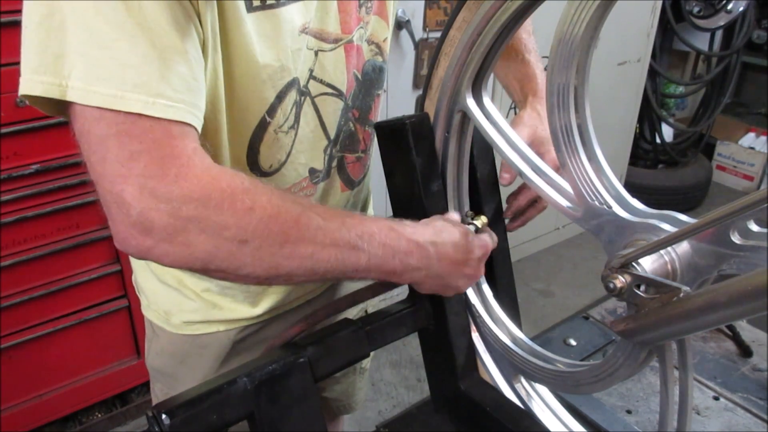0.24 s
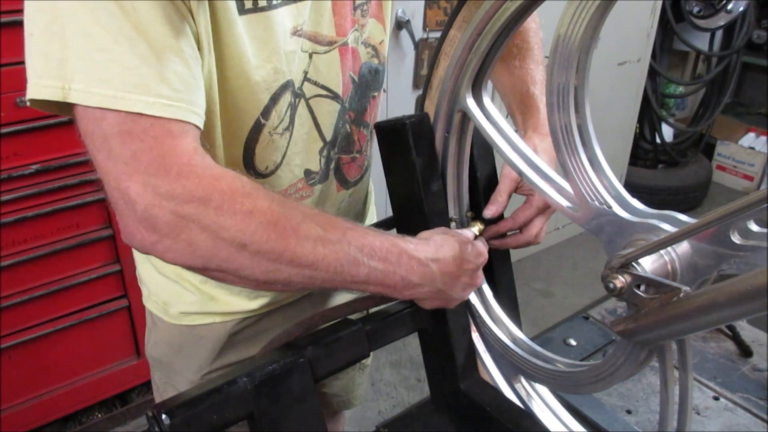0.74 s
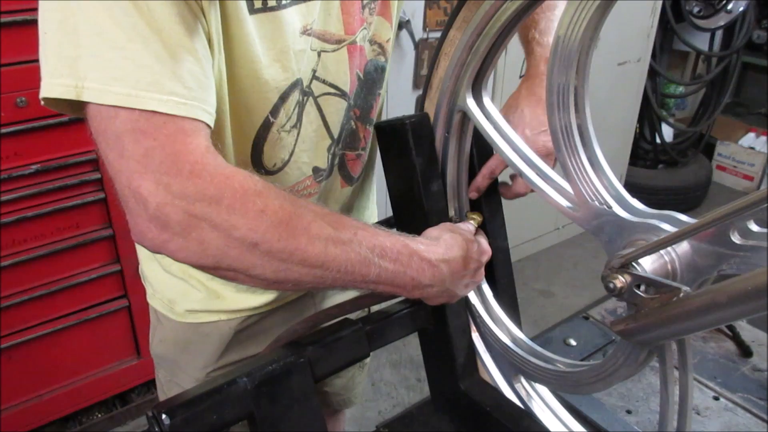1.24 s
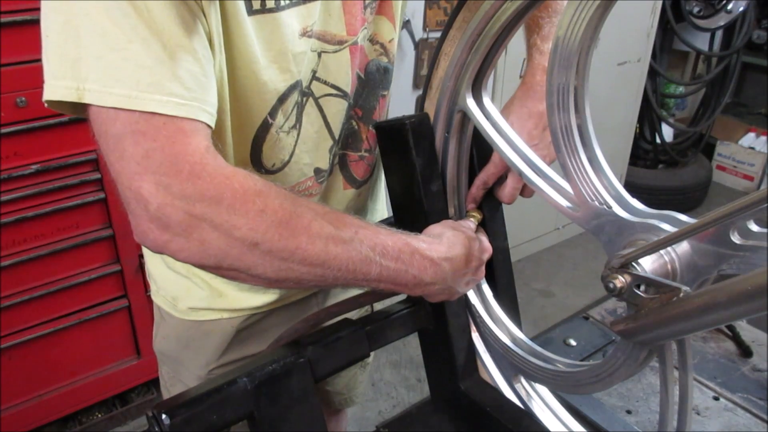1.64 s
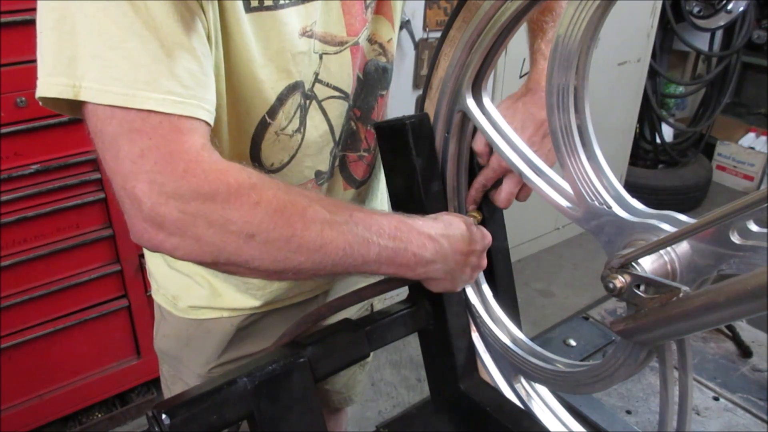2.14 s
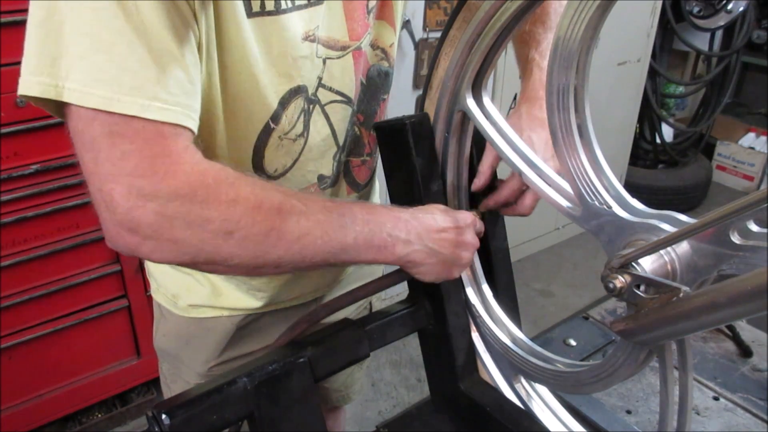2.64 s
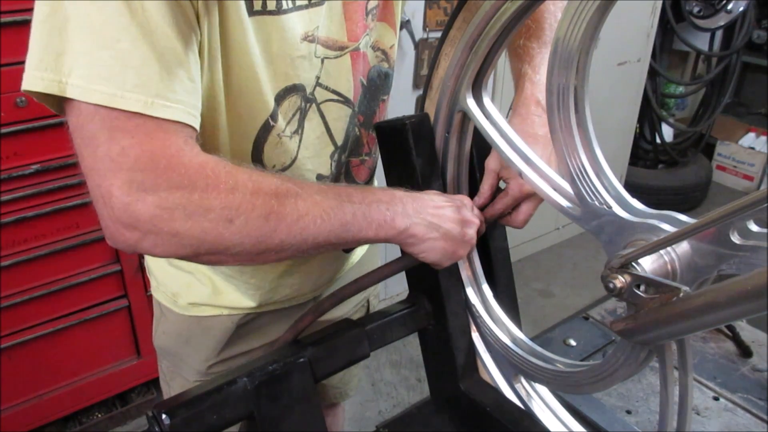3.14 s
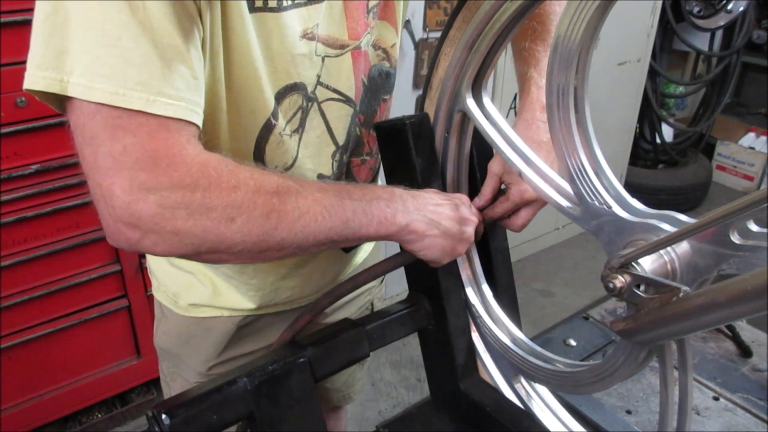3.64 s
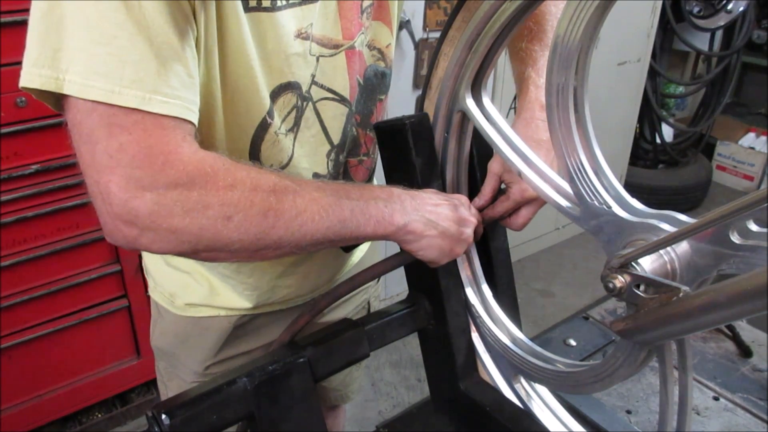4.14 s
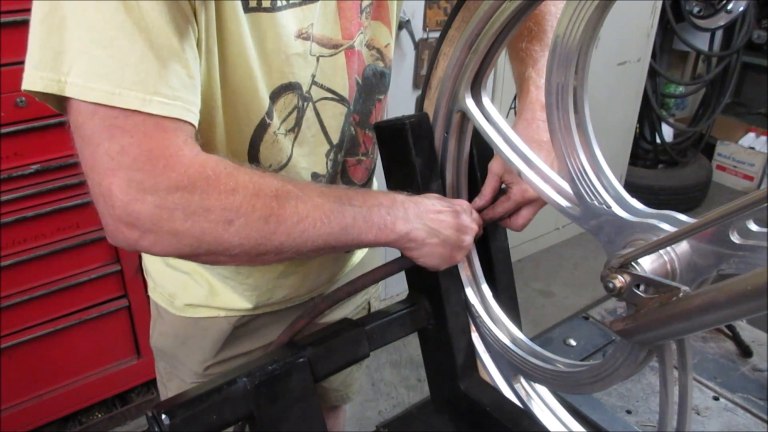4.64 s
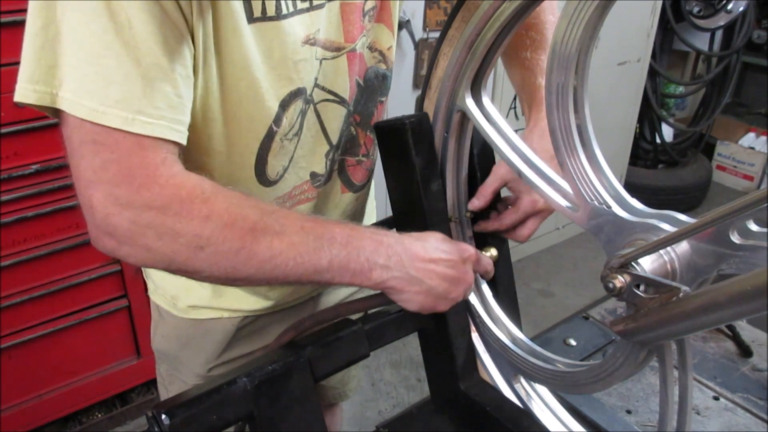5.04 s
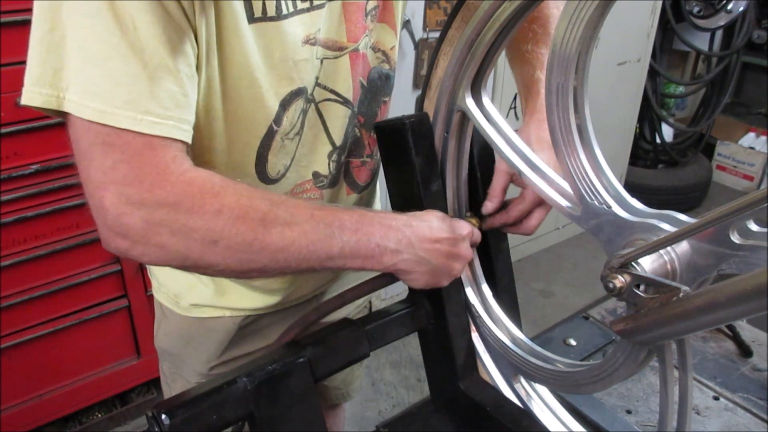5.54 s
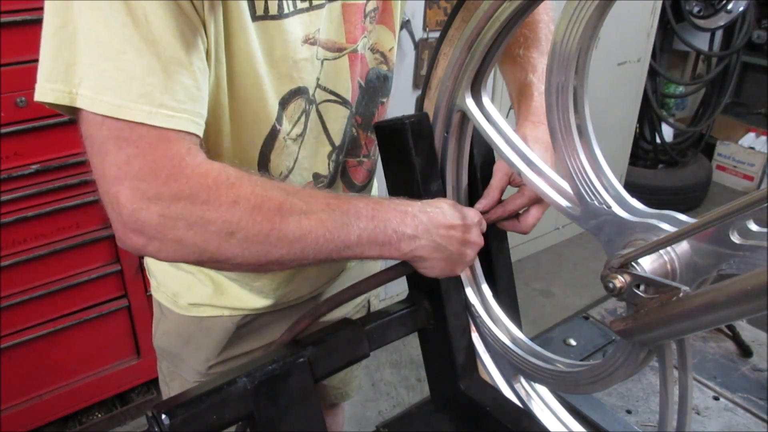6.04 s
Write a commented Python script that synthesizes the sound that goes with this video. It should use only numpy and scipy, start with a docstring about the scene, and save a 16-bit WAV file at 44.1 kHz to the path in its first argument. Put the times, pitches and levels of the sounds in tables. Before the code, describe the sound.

Brass air chuck clicks on a bicycle valve, a thin whistling leak hisses, then a loud air blast roars and snaps off in a humming garage.

```python
"""Air chuck on a bicycle valve

Garage, fan humming behind; chuck and valve close to the microphone, both channels alike.
Brass clicks ring damped resonances; air whistles past a half-seated seal as noise through sharp resonances,
then blasts freely as broad noise and is cut off, ringing in the room. The camera's gain control ducks under
the blast and recovers slowly; after a few more clicks the leak starts again."""
import sys
import numpy as np
from scipy import signal
from scipy.fft import rfft, irfft, next_fast_len
from scipy.io import wavfile
from scipy.ndimage import uniform_filter1d

SR = 44100
rng = np.random.default_rng(int(sys.argv[2]) if len(sys.argv) > 2 else 0)


def generate_wav(signal):
    """Clip the signal to [-1, 1] and save it as 16-bit WAV at the path in sys.argv[1]."""
    frames = np.transpose(np.atleast_2d(signal))
    scaled = np.clip(frames, -1, 1) * 32767
    pcm = np.round(scaled).astype(np.int16)
    wavfile.write(sys.argv[1], SR, pcm)


N = 277022
T = np.arange(N) / SR  # s
HZ = np.maximum(np.fft.rfftfreq(2 * N, 1 / SR), 1)


def undb(db):
    """Decibels to gain."""
    return 10 ** (np.asarray(db) / 20)


def unit(x):
    """Scale to rms 1."""
    return x / np.sqrt(np.mean(x ** 2))


def slope(points):
    """Gain per frequency of an outline of f/Hz and level/dB."""
    hz, db = np.transpose(points)
    return undb(np.interp(np.log(HZ), np.log(hz), db))


def peaks(modes):
    """Gain per frequency of independently driven resonances; a power above 1 sharpens the result."""
    power = 0
    for hz, width, db in modes:
        detuning = (HZ ** 2 - hz ** 2) / (HZ * width)
        power = power + undb(db) ** 2 / (1 + detuning ** 2)
    return np.sqrt(power)


def noise(gain):
    """Turbulence of the given colour, rms 1."""
    size = next_fast_len(N)
    colour = np.interp(np.fft.rfftfreq(size, 1 / SR), HZ, gain)
    white = rng.standard_normal(size)
    return unit(irfft(rfft(white) * colour, size)[:N])


def walk(rate):
    """Smooth random wandering through about rate new values per second, spread near 1."""
    k = max(int(SR / rate), 2)
    steps = np.repeat(rng.standard_normal(N // k + 2), k)
    return 0.86 * uniform_filter1d(steps, k)[rng.integers(k):][:N]


def ring(modes, t):
    """Answer of resonances to one blow, peak 1; narrow ones swell and ring longer."""
    y = 0
    for hz, width, db in modes:
        swell_and_decay = width ** 2 * t * np.exp(-np.pi * width * t)
        y = y + undb(db) * swell_and_decay * np.sin(2 * np.pi * hz * t)
    return y / np.abs(y).max()


def during(s, length):
    """1 around time s with soft edges, down to 1/e at the ends of the length."""
    return np.exp(-(2 * (T - s) / length) ** 6)


def envelope(start, end, rise_s, release_s):
    """Attack, hold and release of a flow of air; rise and release are time constants."""
    attack = 1 - np.exp(-np.maximum(T - start, 0) / rise_s)
    return attack * np.exp(-np.maximum(T - end, 0) / release_s)


# fan shaft orders and mains hum: f/Hz, relative level/dB
HUM = [(58.6, -58), (117, -49.5), (120, -58), (175.5, -60), (234, -48), (240, -59.5), (349.9, -51.5),
       (409, -56), (585, -57), (640, -53.5), (754, -54.5)]
# air noise of the fan and the garage: f/Hz, relative level/dB
GARAGE = [(25, -9), (58, -2), (80, -3), (150, 2), (300, -2), (480, -2), (700, 0.5), (1050, -6), (1480, -4),
          (1750, -11), (3000, -18), (5000, -24.5), (10000, -31.5), (15000, -43.5)]


def fan(waver_db=3.0, drift=.4, swell_db=1.5, flutter=0.77, air_db=-39.5):
    """Wavering shaft tones beat against the mains hum, over a rush of air that swells gently."""
    tones = 0
    for hz, db in HUM:
        level = undb(db + waver_db * walk(14))
        # slow drift of the speed and quicker eddies both push the phase about (radians)
        phase = 2 * np.pi * (hz * T + rng.random()) + drift * walk(4.5) + flutter * walk(24)
        tones = tones + level * np.sin(phase)
    air = undb(air_db + swell_db * walk(4.1)) * noise(slope(GARAGE))
    return np.sqrt(2) * tones + air


# chuck knocking on the valve: t/s, level/dB, hardness as snap over ring/dB (the snap is halved besides)
CLICKS = [(0.004, -16, -11), (1.6455, -16, -19), (3.044, -16, -25), (3.1703, -3.5, -19),
          (3.497, -10.5, 22.5), (4.7645, 1.5, 7), (5.553, -24, -23), (5.5615, -10.5, -16),
          (5.762, -18.5, -5), (5.795, -27, -7), (5.877, -29, -30), (5.888, -21, -30), (5.904, -27, -30),
          (6.094, -22, -9), (6.108, -11.5, -9)]
# the chuck's bore: f/Hz, width/Hz before damping or sharpening, relative level/dB before sharpening
BORE_MODES = [(2195, 450, -0.5), (2330, 230, 4), (3430, 680, -11.5)]
# the wheel in its stand: f/Hz, width/Hz, relative level/dB
WHEEL_MODES = [(127.6, 54, 3), (443, 300, -3.5), (690, 190, 1), (1250, 240, -3.5)]
# the metal rim: f/Hz, width/Hz, relative level/dB
RIM_MODES = [(674, 25, -1), (766, 43, -4), (890, 31, 4.5), (1940, 84, -9.5), (2300, 70, -6),
             (2475, 130, -8), (2810, 81, -9.5), (3220, 70, -9.5)]
# the snap of brass on brass: f/Hz, relative level/dB
SNAP = [(1500, -18), (3200, 0.5), (4500, -0.5), (6100, -0.5), (8000, -4), (15000, -19)]
# share of every knock that goes into wheel and rim, and the change of the rim's level while it is muted
WHEEL_DB, RIM_DB, RIM_MUTE_DB = -13.5, -7.5, -13
MUTE_MARGIN_S = .02  # knocks from this long before the first leak until this long after the blast have a muted rim


def clicks(snap_s=0.0009, hand_damping=1.3):
    """Each knock snaps, rings the bore that the hand damps, thuds through the wheel and rings the rim."""
    t = T[:SR // 4]
    bore = ring([(hz, width * hand_damping, db) for hz, width, db in BORE_MODES], t)
    wheel, rim = ring(WHEEL_MODES, t), ring(RIM_MODES, t)
    grit = noise(slope(SNAP))
    out = np.zeros(N + len(t))
    for k, (s, db, hardness_db) in enumerate(CLICKS):
        # a different stretch of grit for each knock
        snap = np.roll(grit, k * len(t))[:len(t)] * np.exp(-t / snap_s) / 2
        muted = LEAKS[0][0] - MUTE_MARGIN_S < s < BLAST_STOP_S + MUTE_MARGIN_S
        knock = bore + undb(WHEEL_DB) * wheel
        knock = knock + undb(RIM_DB + RIM_MUTE_DB * muted) * rim + undb(hardness_db) * snap
        start = max(int(s * SR), 0)
        out[start:start + len(t)] += undb(db) * knock
    return out[:N]


# brief spits and whistles of air at the valve: t/s (middle), length/s, f/Hz, width/Hz before sharpening, level/dB
SPITS = [(0.701, 0.0047, 5970, 1900, -34), (1.11, 0.046, 9600, 4000, -57.5),
         (1.902, 0.26, 8430, 259.5, -22.5), (2.872, .045, 9000, 700, -23.5), (4.752, 0.016, 7340, 800, 6.5)]


def spits():
    """Air slips out for a moment, each time through a gap with its own pitch."""
    out = 0
    for s, length, hz, width, db in SPITS:
        whistle = noise(peaks([(hz, width, 0)]) ** 1.3)
        out = out + whistle * undb(db) * during(s, length)
    return out


# leaks past the seal, one for each way the chuck sits: start t/s, end t/s, rise/s, level/dB,
# then relative level/dB of the gap's whistle, the bore's ring and the sizzle
LEAKS = [(1.647, 1.726, .002, -41, -11, -16, -1), (1.717, 2.676, 0.0086, -18.5, 0.5, -9, 1.5),
         (2.676, 2.895, 0.0077, -22, -1, -15, -5), (2.901, 3.17, 0.0071, -23.5, -1.5, -15, -3),
         (3.178, 3.489, 0.013, -26.5, -3, -10.5, -10.5), (6.116, 6.163, 0.0048, -9, -6.5, -12, 0.5),
         (6.166, 6.4, .012, -4.5, -1.5, -14.5, -1.5)]
# gap between seal and valve: f/Hz, width/Hz before sharpening, relative level/dB
GAP_MODES = [(4024, 540, -12), (5000, 350, 0), (6090, 390, -3.5), (7460, 1200, -3), (8260, 150, -3.5),
             (8620, 470, 2), (9370, 300, -3.5)]
# finest jets: f/Hz, width/Hz and relative level/dB, both before sharpening
SIZZLE_MODES = [(10130, 750, -0.5), (11180, 400, -1), (12000, 98, 2.5), (12980, 190, -1),
                (14000, 300, -2.5), (14700, 500, -7)]
# turbulence under those resonances: f/Hz, relative level/dB
LEAK_BED = [(600, -29), (1400, -11.5), (3200, -8), (4600, -4.5), (6000, -1), (8500, -2), (10500, -10),
            (13000, -4), (15000, -12.5)]
# a leak holds, then wanes as the hand presses the seal home; its finest jets close first
LEAK_HOLD_S, LEAK_SAG_DB_PER_S, SIZZLE_SAG_DB_PER_S, LEAK_RELEASE_S = 0.69, 10, 6, 0.013


def leak(gap_db=-2.0, bore_db=-3.0, sizzle_db=-4, bed_db=-4, flutter_db=0.25, sputter_db=0.84, wander_db=1.86):
    """Air squeezes past the seal and sings in gap and bore; the unsteady hand shifts their balance."""
    gap = 0
    for hz, width, db in GAP_MODES:
        whistle = noise(peaks([(hz, width, 0)]) ** 1.7)
        # a wider resonance passes more power
        gap = gap + whistle * np.sqrt(width) * undb(db + wander_db * walk(12))
    gap = undb(gap_db) * unit(gap)
    bed = undb(bed_db) * noise(slope(LEAK_BED))
    bore = noise(peaks(BORE_MODES) ** 1.3) * undb(bore_db + wander_db * walk(22))
    sizzle = noise(peaks(SIZZLE_MODES) ** 2) * undb(sizzle_db)
    out = 0
    for start, end, rise_s, level_db, whistle_db, ring_db, fine_db in LEAKS:
        age = np.maximum(T - start, 0)
        sag_db = LEAK_SAG_DB_PER_S * np.maximum(age - LEAK_HOLD_S, 0)
        flow = envelope(start, end, rise_s, LEAK_RELEASE_S) * undb(level_db - sag_db)
        hiss = bed + undb(whistle_db) * gap + undb(ring_db) * bore
        hiss = hiss + undb(fine_db - SIZZLE_SAG_DB_PER_S * age) * sizzle
        out = out + flow * hiss
    return out * undb(flutter_db * walk(40) + sputter_db * walk(500))


# the free jet: f/Hz, relative level/dB
JET = [(400, -38.5), (900, -15.5), (1400, -7.5), (1800, -8), (2300, -2), (2850, -6), (3200, -1.5),
       (3800, -4.5), (5150, 1), (6700, -1), (8700, -1), (11000, -4), (13200, -5.5), (15000, -9)]
# resonances of the open chuck: f/Hz, width/Hz, relative level/dB
JET_MODES = [(2273, 300, 1), (5095, 380, 0), (5960, 130, -6), (7700, 300, -3.5), (8620, 160, -0.5),
             (9130, 390, 1), (10560, 160, -2), (12920, 280, -8)]
# the jet's buffeting: f/Hz, relative level/dB
BUFFET = [(30, -35), (70, -19), (150, -5.5), (280, -3), (700, 0), (1300, 3), (3000, -23)]
# the jet grazes rim and fingers: start t/s, end t/s, rise/s, added buffeting level/dB
GRAZES = [(4.089, 4.472, .035, -24), (4.721, 4.766, 0.03, -17.5)]
BUFFET_DB, GRAZE_RELEASE_S = -30, .03
# the blast swells as the seal lifts, spends the pressure stored in the hose and stops when the valve shuts
BLAST_START_S, BLAST_STOP_S, BLAST_DB = 3.48, 4.7645, 4
BLAST_OPEN_S, BLAST_SWELL_DB, BLAST_RELEASE_S = 0.037, 34, .0012
SURGE_DB, SURGE_S = 3.6, 0.093


def blast(flutter_db=1.06, gust_db=3.3, graze_lift_db=1.54, pop_db=13, pop_hz=1150, pop_width_hz=1000, pop_s=0.0041):
    """The free jet roars through the open chuck, flutters, buffets rim and fingers, and ends with a pop."""
    age = np.maximum(T - BLAST_START_S, 0)
    opening_db = -BLAST_SWELL_DB * np.maximum(1 - age / BLAST_OPEN_S, 0)
    surge_db = SURGE_DB * np.exp(-np.maximum(age - BLAST_OPEN_S, 0) / SURGE_S)
    valve = envelope(BLAST_START_S, BLAST_STOP_S, BLAST_RELEASE_S, BLAST_RELEASE_S)
    buffeting, lift_db = undb(BUFFET_DB), 0
    for start, end, rise_s, db in GRAZES:
        graze = envelope(start, end, rise_s, GRAZE_RELEASE_S)
        buffeting = buffeting + undb(db) * graze
        lift_db = lift_db + graze_lift_db * graze
    jet = noise(np.hypot(slope(JET), peaks(JET_MODES)))
    buffet = noise(slope(BUFFET)) * buffeting * undb(gust_db * walk(30))
    pop = noise(peaks([(pop_hz, pop_width_hz, 0)]) ** 1.2) * undb(pop_db) * during(BLAST_STOP_S, pop_s)
    level = undb(BLAST_DB + opening_db + surge_db + lift_db + flutter_db * walk(60))
    return (jet + buffet) * valve * level + pop


def garage(x, near_db=-10, tail_db=-15, t60_s=0.56, treble_t60_s=0.23, treble_hz=8800, near_s=0.026,
           metal_db=-28, metal_hz=7480, metal_width_hz=350):
    """Arms and tool chest scatter at once; the room follows, treble dying first, and bare metal sings along."""
    t = T[:int(.8 * SR)]
    near, late = rng.standard_normal((2, len(t)))
    near = near * np.exp(-t / near_s) * (t > .002)
    fade, treble_fade = (np.exp(-np.log(1000) * t / t60) for t60 in (t60_s, treble_t60_s))
    low = signal.sosfilt(signal.butter(3, treble_hz, "low", fs=SR, output="sos"), late)
    high = signal.sosfilt(signal.butter(3, treble_hz, "high", fs=SR, output="sos"), late)
    tail = (low * fade + high * treble_fade) * (t > .008)
    metal = noise(peaks([(metal_hz, metal_width_hz, 0)]) ** 2)[:len(t)] * fade
    parts = [(near_db, near), (tail_db, tail), (metal_db, metal)]
    echoes = sum(undb(db) * part / np.linalg.norm(part) for db, part in parts)
    wet = x + signal.fftconvolve(x, echoes)[:N]
    return wet / np.sqrt(1 + np.sum(echoes ** 2))


def gain_control(x, top_db=-11.0, release_db_per_s=3, sense_s=0.0019):
    """The gain falls as soon as the sensed level passes the top and creeps back up."""
    a = np.exp(-1 / (sense_s * SR))
    level_db = 10 * np.log10(signal.lfilter([1 - a], [1, -a], x ** 2) + 1e-12)
    recovery_db = release_db_per_s * T
    # highest level so far, sinking at the release rate
    held_db = np.maximum.accumulate(level_db + recovery_db) - recovery_db
    return x * undb(-np.maximum(held_db - top_db, 0))


# the level dips briefly: t/s (middle), length/s, depth/dB below the treble
DIPS = [(1.847, 0.022, 13), (1.936, 0.051, 21.5), (2.574, 0.02, 11), (2.746, 0.0088, 20),
        (6.135, 0.017, 24)]
DIP_BELOW_HZ, DIP_TREBLE_SHARE = 4470, 0.075  # the treble takes this share of the depth in dB


def dips(x):
    """The level sags for an instant, mostly below the treble."""
    low = signal.sosfiltfilt(signal.butter(6, DIP_BELOW_HZ, fs=SR, output="sos"), x)
    sag_db = sum(depth_db * during(s, length) for s, length, depth_db in DIPS)
    return low * undb(-sag_db) + (x - low) * undb(-DIP_TREBLE_SHARE * sag_db)


def scene():
    """Chuck and valve in the room, with the fan behind; both channels hear the same."""
    at_valve = leak() + blast() + spits() + clicks()
    sound = garage(at_valve) + fan()
    return np.array([sound, sound])


def record(dry, top_hz=15050):
    """The camera rides its gain, rounds the peaks that slip through and cuts the top."""
    sound = dips(gain_control(dry.mean(axis=0)))
    sound = sound / (1 + (sound / .72) ** 6) ** (1 / 6)  # soft ceiling at 0.72
    sound = signal.sosfilt(signal.ellip(12, .2, 80, top_hz, fs=SR, output="sos"), sound)
    return np.array([sound, sound])


dry = scene()
out = record(dry)
generate_wav(out)
```